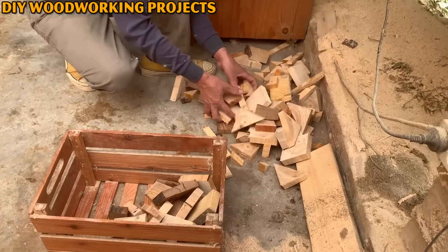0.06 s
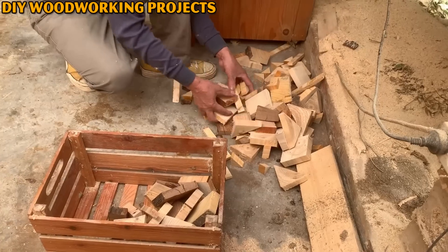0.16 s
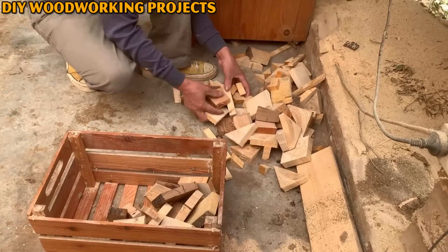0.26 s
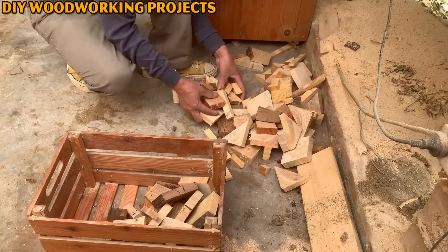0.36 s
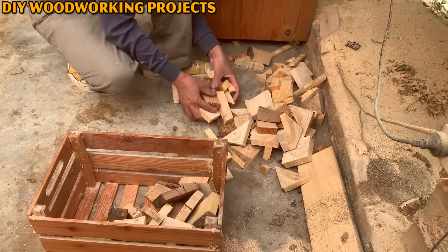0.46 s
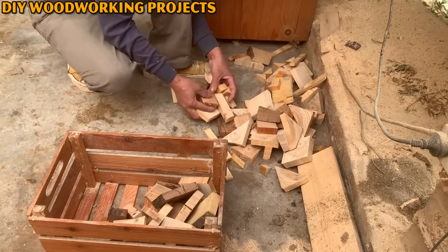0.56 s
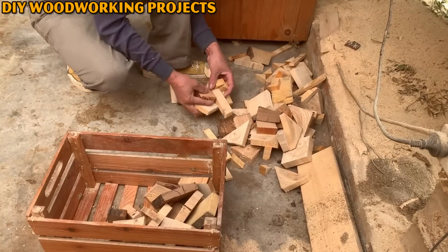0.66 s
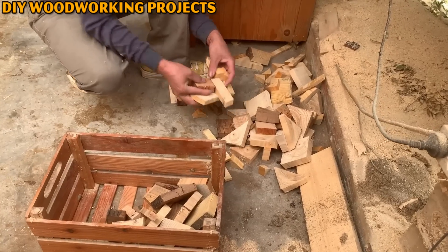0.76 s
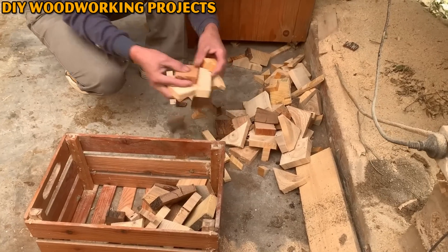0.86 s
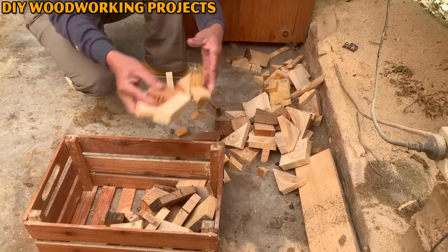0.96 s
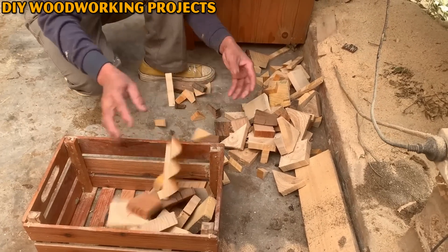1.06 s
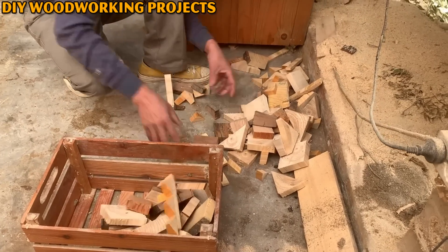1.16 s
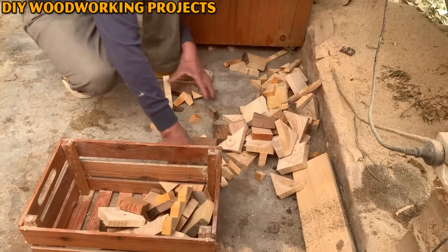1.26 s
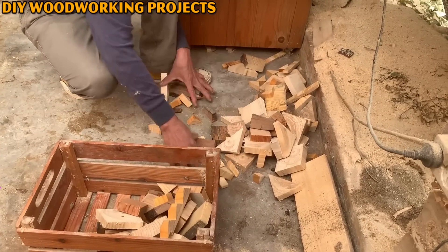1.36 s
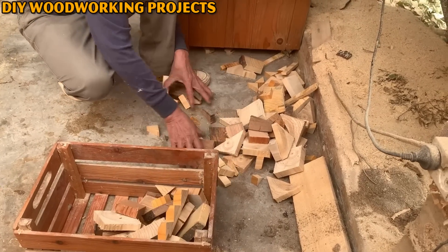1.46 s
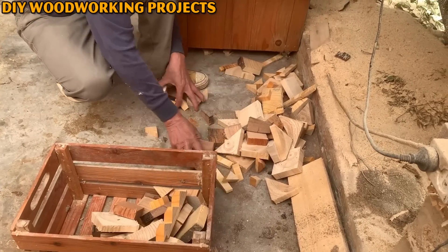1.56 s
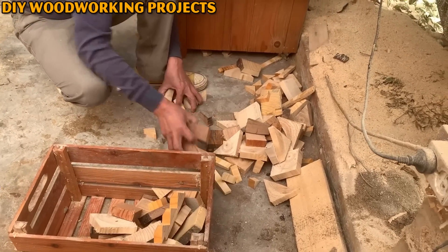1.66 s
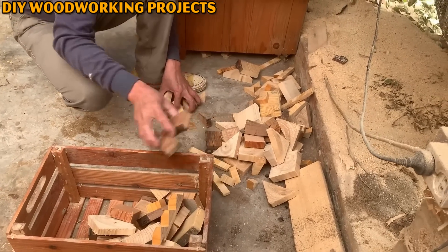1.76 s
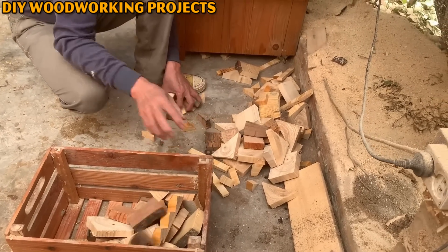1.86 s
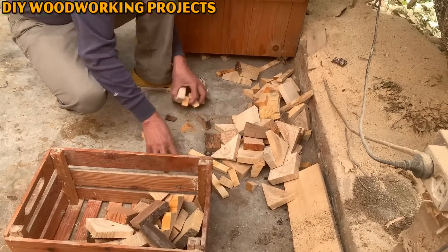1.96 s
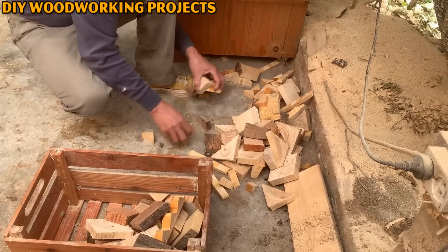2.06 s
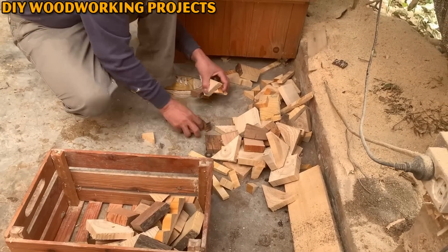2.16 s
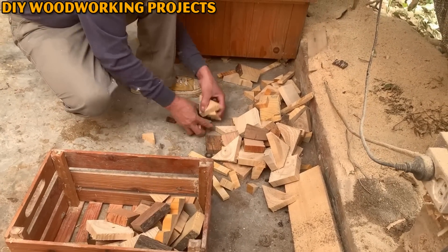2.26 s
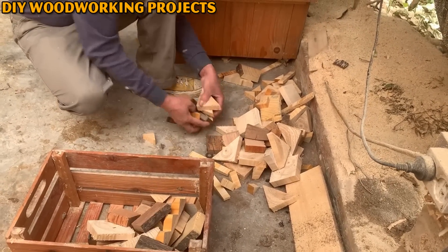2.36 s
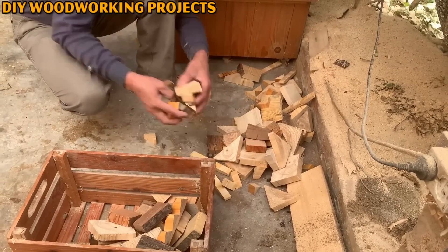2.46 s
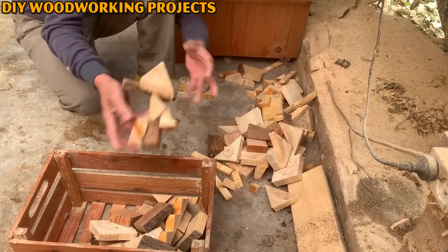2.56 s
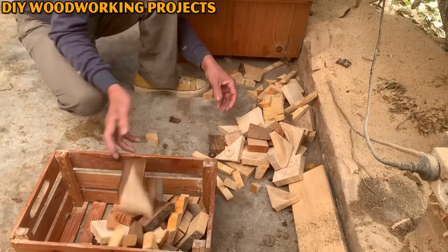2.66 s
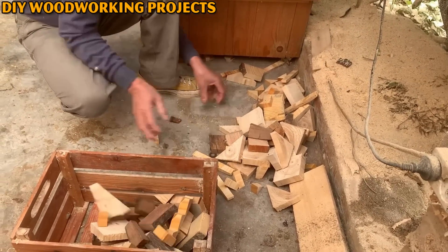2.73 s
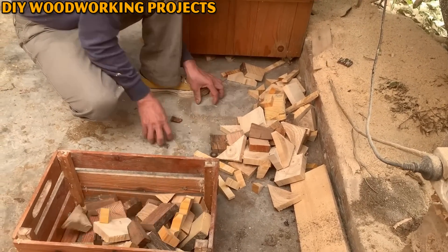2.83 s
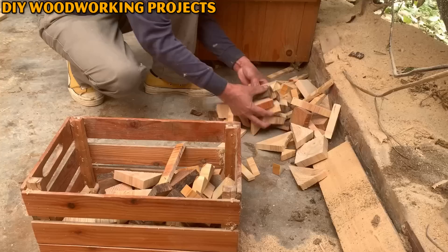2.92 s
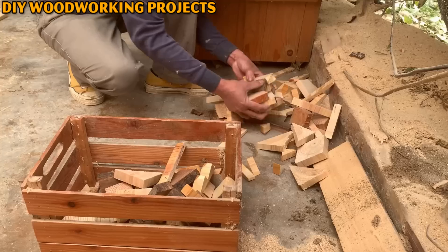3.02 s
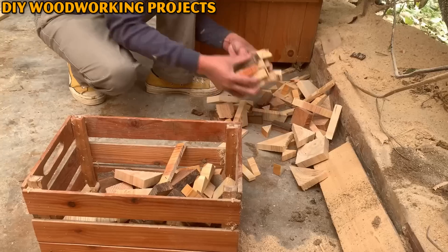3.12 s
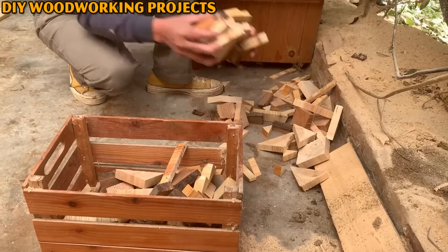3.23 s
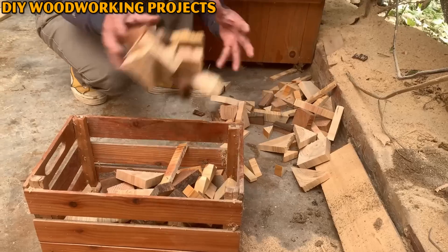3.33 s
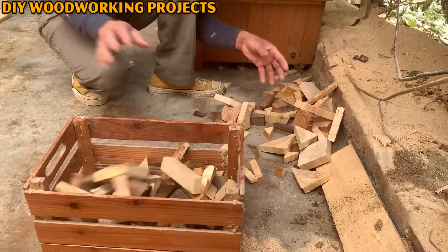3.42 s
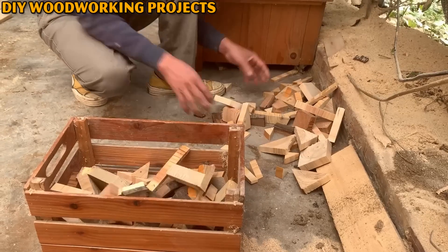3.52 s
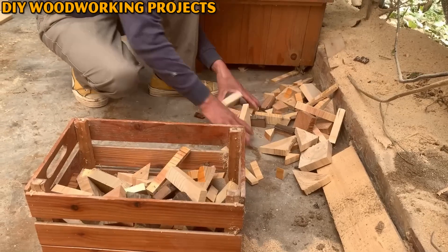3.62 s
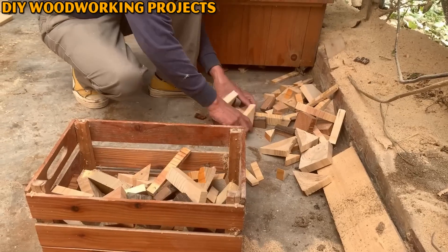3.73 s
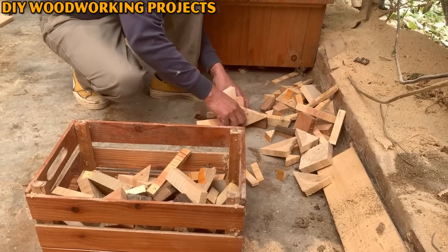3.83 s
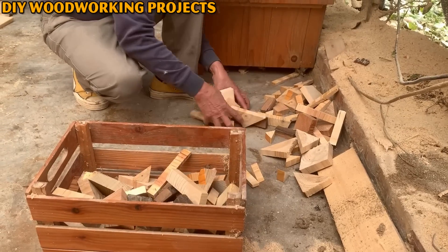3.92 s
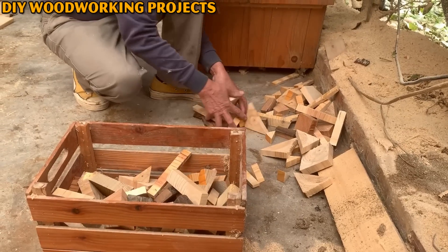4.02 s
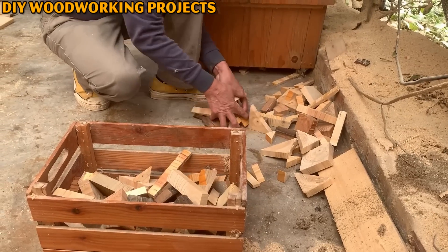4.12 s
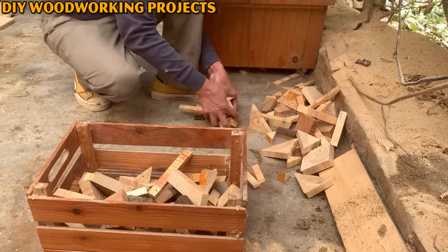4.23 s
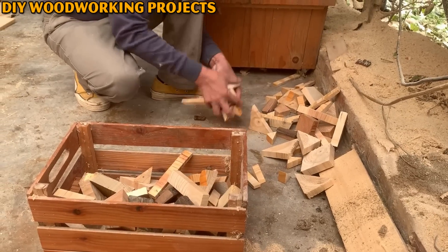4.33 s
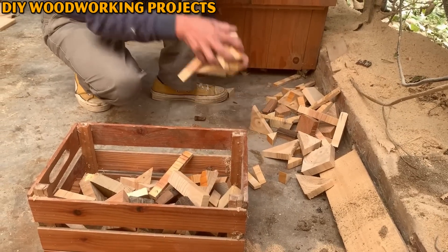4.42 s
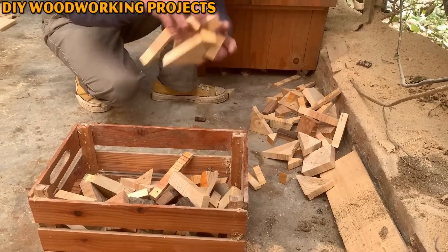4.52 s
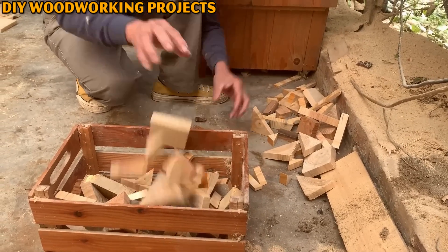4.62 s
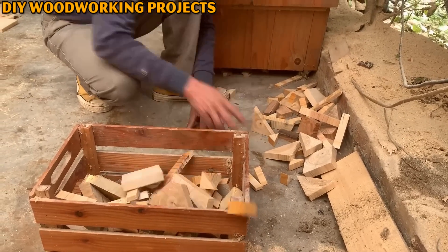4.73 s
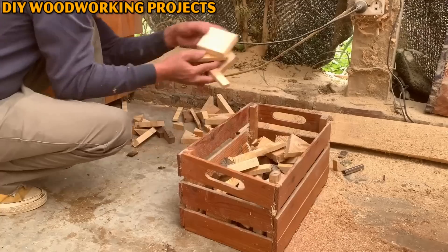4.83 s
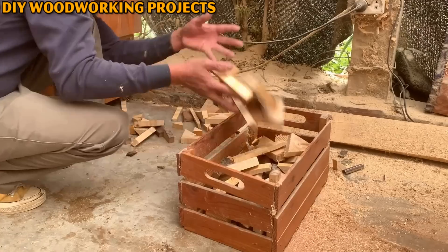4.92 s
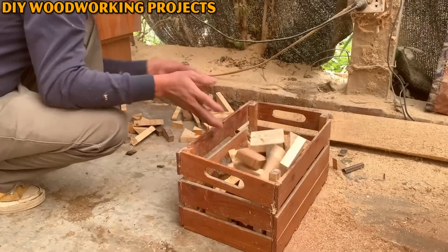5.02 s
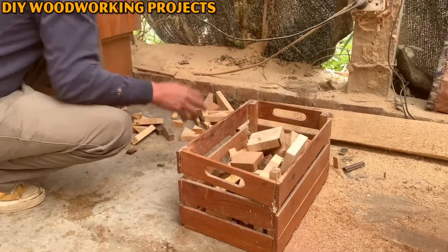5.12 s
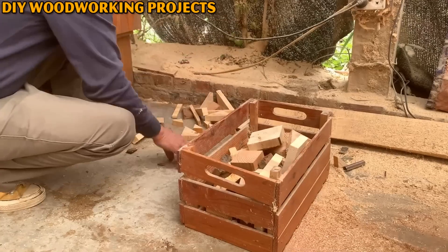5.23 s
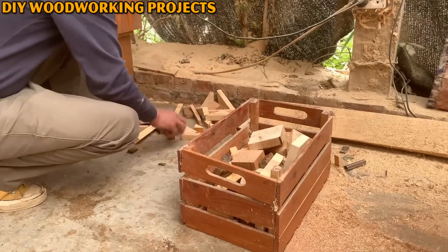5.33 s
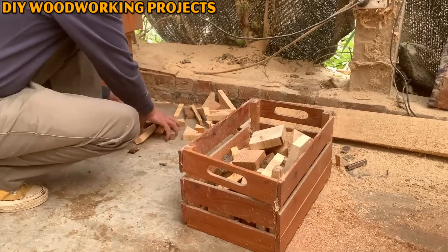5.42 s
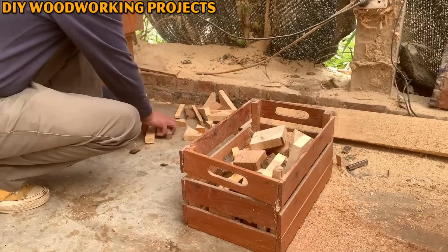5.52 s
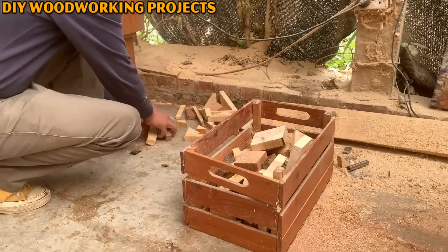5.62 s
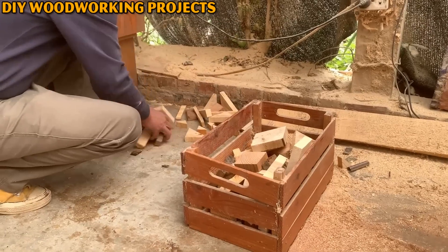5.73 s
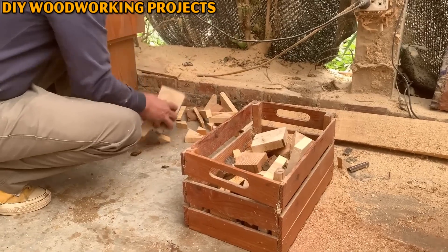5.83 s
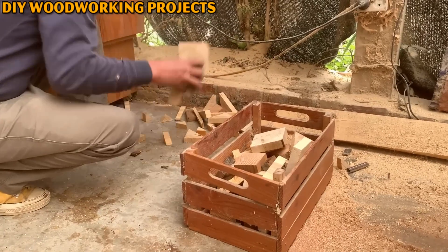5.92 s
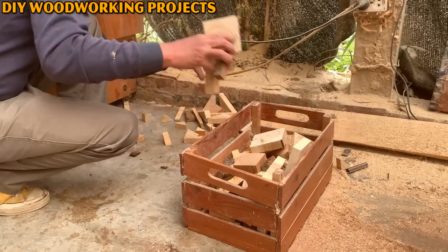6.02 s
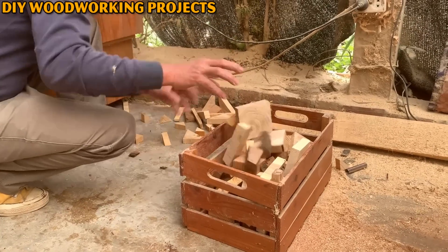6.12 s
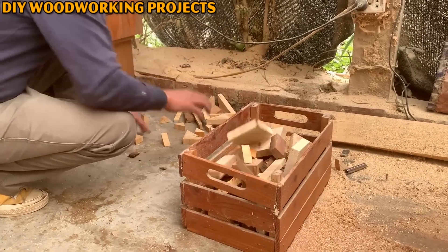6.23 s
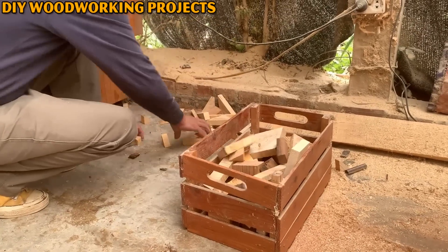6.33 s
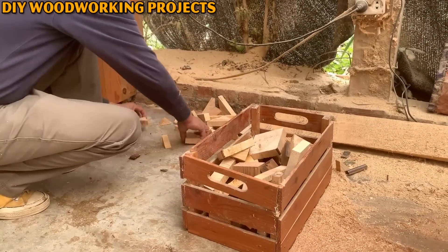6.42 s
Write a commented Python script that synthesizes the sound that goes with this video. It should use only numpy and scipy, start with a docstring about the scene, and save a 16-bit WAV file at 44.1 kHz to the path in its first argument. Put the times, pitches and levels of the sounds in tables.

```python
"""Wood offcuts knock and clatter as hands rake them over a dusty concrete floor and toss them into a slatted crate.
Every knock is a short chatter of contacts that rings the block, its neighbours and the crate, with a surface crack.
Raking and tumbling are ticked and rubbed wood rings, sawdust hiss and low drag; one block squeaks, all shaped noise.
A roofed yard answers the knocks with a short noise tail, over a low outdoor rumble of drifting noise bands.
Two widely spaced microphones hear it; twice the level dips for a moment."""
import sys
import numpy as np
from scipy import signal
from scipy.fft import rfft, irfft
from scipy.io import wavfile
from scipy.ndimage import uniform_filter1d

SR = 44100
rng = np.random.default_rng(int(sys.argv[2]) if len(sys.argv) > 2 else 0)


def write(x):
    x = np.atleast_2d(x).T
    wavfile.write(sys.argv[1], SR, np.round(np.clip(x, -1, 1) * 32767).astype(np.int16))

N = 285768  # length in samples

# knocks of block on block and crate: loudest_s, block_db, lower_ring_db (re block), crate_thud_db (re block),
# crack_db (re block), lower_ring_hz, block_pitch_hz, build_up_ms
KNOCK_EVENTS = [(0.013, -52, -3, 1.5, -29, 945, 1590, 2.9), (0.068, -49.5, -8, -3, -20, 1038, 1960, 2.4),
                (0.198, -56, 6, 6, -5.5, 500, 1520, 4.6), (0.294, -59, -6, -5, -9, 530, 2880, 1.9),
                (0.315, -52, -26, -20, -15, 1330, 2990, 2.5), (0.402, -59, -3, 5, -6, 830, 3200, 3.3),
                (0.44, -57, -4, -6, -11, 930, 4240, 1.4), (0.489, -46.5, -29, -12, -7, 1320, 3400, 2.1),
                (0.545, -52.5, 7, 2, -7.5, 956, 1700, 5.9), (0.617, -47.5, -7, -10, -11, 1430, 1520, 11),
                (0.779, -55, -4, -25, -24, 1020, 2880, 1.3), (0.907, -55, -10, -13.5, 8, 905, 3250, 3),
                (1.024, -48, 8.5, 2.5, -22, 660, 2000, 2.5), (1.046, -32, -6, -9.5, -20, 710, 1540, 3.1),
                (1.058, -39.5, 4, -8.5, -9, 910, 4830, 10.4), (1.096, -35.5, -15, -8, -24, 750, 2590, 2.1),
                (1.118, -44.5, -12, 4, -30, 534, 1520, 3), (1.129, -45.5, 11, -2.5, -16, 487, 1760, 7.5),
                (1.145, -26, -21.5, -12.5, -9.5, 1580, 1750, 3.7),
                (1.169, -31, 3.5, -9, -12, 1250, 1930, 2.5), (1.177, -23, -18, -10.5, -22, 1230, 3100, 3.2),
                (1.202, -43, 5, -31, -29, 492, 1720, 12), (1.252, -43, -7, -11, -17, 547, 1800, 2.2),
                (1.268, -50.5, 7, -4, -23, 740, 1510, 2.1), (1.306, -29, -25, -24.5, -7.5, 1110, 5140, 2.3),
                (1.573, -62.5, 7.5, -22, -31, 734, 1640, 1.6), (1.631, -51, -15, -3, -9, 1140, 3000, 12),
                (1.702, -54.5, -16.5, -12, -20, 950, 2120, 1.6), (1.909, -47, 3, -14, -37, 1144, 1780, 4.3),
                (1.961, -31.5, -11.5, -26, -17, 1370, 3010, 2.6),
                (1.967, -27.5, -5, -10.5, -18, 1400, 1460, 2.1),
                (1.976, -28, -7, -35, -4.5, 1110, 5840, 3.1), (2.099, -57, -15, -6, -8, 890, 2920, 4.4),
                (2.218, -53, -8, -32, -19, 797, 2870, 3.5), (2.392, -50, -14, -9, -11, 837, 2830, 1.6),
                (2.422, -52, -12.5, -10.5, -0.5, 1020, 4800, 4.1),
                (2.755, -33.5, -0.5, -17.5, -14.5, 850, 2750, 4), (2.77, -27, -14, -33, -15, 1050, 2600, 8),
                (2.799, -29, -18.5, -11, -22, 1600, 1450, 2.8),
                (2.807, -21, -34.5, -50, -26, 1320, 4550, 2.4),
                (2.829, -43, -7.5, -30, -12, 1260, 2070, 2.8),
                (2.909, -40.5, -0.5, -28, -15, 643, 1470, 1.6), (2.917, -41, 6, -8, -9.5, 756, 2320, 2.7),
                (2.962, -27.5, -4, -15, -22, 1220, 1945, 2.3), (2.972, -35, -4, -10, -20, 790, 1880, 9.4),
                (3.038, -59.5, 2, -9, -19, 1130, 1640, 4), (3.077, -46.5, 7, -6, -30, 956, 3920, 2.5),
                (3.093, -50.5, -1, 4, -42, 590, 1940, 3.3), (3.224, -65, 6, 13, -6, 900, 3300, 3),
                (3.335, -60.5, -3, -7.5, -20, 1230, 1550, 2.5),
                (3.506, -31, -9, -22.5, -19, 1403, 1650, 5.3),
                (3.523, -11.5, -15, -36, -27.5, 1040, 2524, 6.5),
                (3.531, -31.5, -4.5, -23, -10.5, 820, 1980, 11),
                (3.546, -28.5, -2, -19, -18.5, 848, 3900, 12), (3.559, -24, -3, -23, -17.5, 860, 1900, 3.3),
                (3.569, -21.5, -10, -23.5, -21.5, 840, 3500, 10.8),
                (3.68, -55, 9.5, -3, -47, 915, 1760, 4.5), (3.752, -42.5, 0.6, -16, -37, 1160, 1600, 2.7),
                (3.78, -51.5, -20, -17, -19, 740, 3170, 2.1), (3.805, -54, 5.5, -8, -8, 1005, 1510, 1.2),
                (3.921, -56.5, 0.6, -9, -20, 1020, 1490, 4.2), (4.034, -60, 9.5, 11.5, -16, 850, 1970, 5.3),
                (4.111, -49, -7, -6, -17, 880, 2500, 10), (4.136, -58, 10, 13, -9, 800, 3140, 2.9),
                (4.144, -40.5, -4.5, -14, -25.5, 1200, 3140, 2.6),
                (4.277, -40, -8, -19, -6, 1180, 2860, 2.1), (4.292, -51, 4.5, -21.5, -22, 874, 1503, 2.1),
                (4.319, -36.5, -9, -18, -13.5, 824, 2944, 2.4),
                (4.716, -23, 1.5, -26.5, -23.5, 1310, 1614, 4),
                (4.723, -29, -4, -26, -22.5, 1280, 1530, 9.6), (4.744, -37, -0.5, -18, -6, 940, 1900, 12.8),
                (4.765, -28, -1.5, -17, -14, 980, 3600, 2.1),
                (4.782, -34, -7.5, -10.5, -20, 794, 2040, 11.6),
                (4.798, -32, -10, -25, -17, 700, 2090, 2.7), (4.832, -49, -5, -10, -15, 800, 2150, 16),
                (4.886, -43.5, -4, -17, -40, 1530, 2630, 4.4), (4.904, -47.5, -9, -9.5, -9, 560, 4130, 5.1),
                (4.962, -46.5, -1, -23, -17, 1081, 1560, 3.5), (4.976, -46, -2.5, -27, -15, 963, 4080, 5.1),
                (5.01, -45.5, -23.5, -22.5, -6.5, 720, 4430, 4.1),
                (5.064, -22, -18.5, -21, -26, 1425, 3390, 2.4), (5.083, -32, -6, -15, -6, 1500, 3360, 5),
                (5.107, -34.5, 3, -4.5, -15, 720, 2840, 9.8),
                (5.125, -32.5, 4.5, -18, -26, 1350, 3330, 2.6), (5.144, -34, 1, -12, -28, 740, 2300, 3.6),
                (5.346, -62.5, 11, 7.5, -17.5, 672, 1640, 5.4),
                (5.502, -57.5, 2.5, -14, -8.5, 610, 4300, 2.1), (5.58, -50, 0, -7.5, -6.5, 510, 1550, 6.5),
                (5.62, -53.5, 5, -13, -27, 710, 1930, 3.1), (5.7, -49.5, 2, -36, -12, 1470, 1510, 1.8),
                (5.732, -51.5, -13, -20, -21, 1510, 1420, 9), (5.864, -42.5, 9, -11, -20, 820, 1765, 2.1),
                (6.218, -21.5, -6.5, -40, -27.5, 720, 3430, 5.1),
                (6.234, -27.5, -2, -15.5, -27, 1000, 1930, 9),
                (6.242, -25, -26, -38.5, -24.5, 850, 2130, 8.2),
                (6.279, -40.5, -11, -17, -13, 530, 1810, 9.1), (6.301, -47.5, 2, -27, -19, 1260, 1810, 2.6),
                (6.325, -46.5, 3.5, -5.5, -11, 1040, 1900, 5.1), (6.37, -39.5, 0, -14, -11.5, 535, 3710, 8),
                (6.404, -39, 10.5, -12, -41, 720, 1550, 4.2), (6.466, -31, -0.5, -41, -38, 753, 2070, 4)]
# small knocks under the hands, one row each for block_db (re rasp), lower_ring_db, crate_thud_db and crack_db
# (re block): mean_db, spread_db
NUDGE_LEVELS = [(0.6, 2.5), (3, 4), (-6, 3.5), (-14, 6)]
# resonances of crate slats and air: pitch_hz, relative_level_db, t60_s
CRATE_MODES = [(75, -10, 0.05), (124, -12, .09), (176, -2.5, 0.056), (252.7, 3.5, 0.045), (346.2, 1, 0.049),
               (412, -1.5, 0.035)]
# hands raking pieces over the floor: loudest_s, rasp_db, rise_s (first 20 dB), fall_s (first 20 dB),
# dust_db (re rasp)
RAKE_STROKES = [(.04, -61, .3, .15, -13), (.13, -60, .12, .1, -6), (.3, -63, .3, .5, -13),
                (.545, -58, .1, .12, -11), (.613, -52.5, .045, .055, -12), (.74, -62, .055, .09, -11),
                (.916, -62, .03, .08, -1.5), (1.26, -54, .1, .15, -16), (1.314, -49, .05, .055, -5),
                (1.458, -57, .055, .09, -2.5), (1.632, -52.5, .053, .04, -7), (1.712, -67, .12, .12, -11),
                (1.93, -67, .1, .1, -4.5), (2.12, -62, .12, .04, -10), (2.235, -67.5, .036, .14, -13),
                (2.405, -62, .09, .052, -1.5), (2.607, -72, .12, .08, -8), (3.081, -57, .08, .12, -14),
                (3.18, -67, .1, .25, -17), (3.43, -80, .15, .05, -5), (3.67, -64, .15, .1, -20),
                (3.861, -54.5, .18, .14, -12), (4.0, -65, .15, .2, -11), (4.13, -59, .16, .1, -14),
                (4.285, -48, .04, .075, -8.5), (4.5, -73, .03, .25, -6), (5.02, -63, .2, .1, -2.5),
                (5.25, -67, .1, .1, -22), (5.354, -70.5, .05, .15, -8.5), (5.515, -65.5, .04, .15, -15),
                (5.6, -57, .12, .14, -12), (5.71, -59.5, .05, .25, -9), (5.855, -58, .2, .06, -12),
                (6.02, -80, .08, .1, -10), (6.303, -53.5, .05, .2, -14), (6.46, -60, .2, .1, -17)]
# pieces tumbling around a landing: loudest_s (after a steep rise), rasp_db, slide_s, dust_db (re rasp),
# drag_db (re rasp)
LANDING_TUMBLES = [(1.054, -42, .02, -9, -5), (1.177, -31.5, .005, -14, -4), (1.971, -33, .002, -17, -11),
                   (2.77, -32, .07, -11, -7), (2.917, -47, .06, -12, 4), (3.514, -27, .065, -16, -14),
                   (4.719, -32, .12, -17, -6), (4.896, -47, .003, -17, -15), (5.076, -34, .14, -15, -12),
                   (6.226, -29, .015, -16, -14)]
# colour of small wood on wood: pitch_hz, relative_level_db
RASP_COLOUR = [(450, -11), (900, 1.5), (2000, -4), (3500, -0.5), (6500, -13.5)]
# a block squeaking along the floor: start_s, end_s, level_db
SQUEAK_SPAN = (5.688, 5.785, -57.5)
# rings of the squeaking block: pitch_hz, width_hz, relative_level_db
SQUEAK_MODES = [(1490, 83, -2.5), (3250, 250, -3.5), (720, 74, -11)]
# fading of the yard's answer: pitch_hz, t60_s
ECHO_DECAY = [(100, 0.57), (400, 0.2), (1040, 0.14), (2100, .15), (3800, 0.17), (7280, 0.12)]
# colour of the outdoor background: pitch_hz, relative_density_db (per Hz)
YARD_COLOUR = [(12, -36), (20, 3.5), (103, 9), (225, -2), (404, -7.5), (549, -15.5), (1630, -32),
               (2760, -16.5), (6360, -36), (11400, -27), (15500, -48.5)]
# brief dips in level: start_s, end_s, depth_db
LEVEL_DIPS = [(3.008, 3.03, -24), (4.861, 4.878, -20)]

RING, LEAD = 4096, 800  # samples: one knock in full, and the run-up before its loudest moment
STEP = 64  # samples between points of the raking level curves
PAN_SPREAD_DB = 3  # spread of the level difference between microphones
NUDGE_LOW_HZ, NUDGE_HZ, NUDGE_BUILD_MS = (520, 1200), (1500, 3300), (1.5, 11)  # lowest and highest draw
DRAG_DB, DRAG_SLOPE = -62, .65  # stroke drag when the rasp is at -60 dB; dB gained per dB of rasp
STROKE_BEND = 1.5  # 1 = even fade in dB; more = fuller top, steeper ends
TUMBLE_RISE_DB_S, TUMBLE_SAG_DB_S, TUMBLE_STOP_DB_S, DUST_SETTLES_DB_S = 1050, 120, 400, 50
ECHO_DB, ECHO_BUILD_S = -11, .001  # energy of the tail; time constant of its onset
YARD_DB = -66.5
CEILING, TOP_HZ = .4, 15800  # limit of the rounded peaks; where the top is cut


def knocks():
    """Each chatter of contacts rings the block, its lower neighbours and the crate, and cracks at the surface."""
    rows = np.hstack([np.transpose(KNOCK_EVENTS), nudges()])
    loudest_s, block_db, low_db, thud_db, crack_db, low_hz, block_hz, build_ms = rows
    events, t = len(loudest_s), np.arange(RING // 2) / SR
    pan_db = PAN_SPREAD_DB * rng.standard_normal(events)
    contacts = chatter(build_ms)
    # a blow with little crack is a soft one and leaves the high rings weak
    soft = np.clip(-.045 * (crack_db + 8), 0, 1.6)
    block_ring = block(block_hz, .024, 1418, 7000, -3.5, .019, soft)
    lower_ring = block(low_hz, .024, 450, 1500, -10, .022, np.full(events, .45), count=8)
    crate_hz, crate_db, crate_t60 = np.transpose(CRATE_MODES)
    struck = undb(crate_db) * rng.standard_normal((events, 2, len(CRATE_MODES)))
    thud = modes(crate_hz, struck, crate_t60)
    splinter = rng.standard_normal((events, 2, RING // 2)) * np.exp(-t / .0026)
    crack = band(splinter, 5500, 12500)
    # response, level in dB re block, stretch in s over which its peak is levelled
    parts = [(block_ring, 0, .0025), (lower_ring, low_db, .003), (thud, thud_db, .009), (crack, crack_db, .002)]
    sound = 0
    for response, relative_db, window_s in parts:
        chattered = irfft(rfft(response, RING) * contacts, RING)
        sound = sound + undb(relative_db)[..., None, None] * peak_unit(chattered, window_s)
    sound = sound * undb(block_db[:, None] + np.outer(pan_db, [.5, -.5]))[..., None]
    out = np.zeros((2, N + RING))
    for at, one in zip((loudest_s * SR).astype(int), sound):
        out[:, at:at + RING] += one
    # small pieces move too little air to sound deep
    return band(out[:, LEAD:N + LEAD], 55, 18000)


def chatter(build_ms, count=14):
    """Faces never meet at once: contacts gather round a main blow, at other times for each microphone."""
    events = len(build_ms)
    place, size = rng.laplace(size=(events, 2, count)), rng.standard_normal((events, 2, count))
    main = np.arange(count) == 0
    place = np.clip(np.where(main, .12, .9) * place, -3, 2.6)
    # contacts grow towards the main blow and die after it
    size = np.where(main, 2.2, size) * np.exp(-np.abs(place) / 3.2)
    # the ring is loudest a moment after the main contact
    lag = LEAD - .0017 * SR + .45 * place * build_ms[:, None, None] * SR / 1000
    lag = np.clip(lag, 0, RING // 2 - 1).astype(int)
    train = np.zeros((events, 2, RING))
    np.add.at(train, (np.arange(events)[:, None, None], np.arange(2)[:, None], lag), size)
    return rfft(train)


def block(hz, t60, lo_hz, hi_hz, side_db, side_t60, tilt, count=16):
    """The block's own ring over many short ones of its neighbours; both t60 hold at lo_hz, higher rings die sooner."""
    # each microphone faces other sides of the pieces, so gains differ
    place, gain = rng.random((len(hz), count)), rng.standard_normal((len(hz), 2, count))
    own = np.arange(count) == 0
    spread_hz = lo_hz * (hi_hz / lo_hz) ** ((np.arange(count) - place) / (count - 1))
    pitch = np.where(own, hz[:, None], spread_hz)
    # pieces of like size ring near the block's pitch; above it the softness of the blow decides
    ratio = pitch / hz[:, None]
    near = np.where(ratio > 1, ratio ** -(tilt[:, None] + .17), ratio ** .49)
    side = undb(side_db) * np.sign(gain) * (.6 + .28 * np.abs(gain)) * near[:, None]
    level = np.where(own, 1 + .39 * gain, side)
    decay = np.where(own, t60, side_t60) * ((lo_hz / pitch) ** .75)[:, None]
    rings = modes(pitch[:, None], level, decay)
    # the push takes a fraction of a cycle to build, so the onset is rounded
    return rings * (1 - np.exp(-np.arange(RING // 2) / SR * lo_hz * 3.9))


def modes(hz, gain, t60):
    """Struck resonances: a sum over the last axis of decaying sines."""
    t = np.arange(RING // 2, dtype=np.float32) / np.float32(SR)
    turn = np.asarray(2 * np.pi * hz, np.float32)[..., None] * t
    fade = np.asarray(np.log(1000) / t60, np.float32)[..., None] * t
    return (gain[..., None, :].astype(np.float32) @ (np.sin(turn) * np.exp(-fade)))[..., 0, :]


def nudges(count=85):
    """Small random knocks of raked pieces, laid out as KNOCK_EVENTS columns; their level follows the stroke's rasp."""
    rasp_db = strokes()[0]
    even, normal = rng.random((count, 4)).T, rng.standard_normal((count, 4))
    place = (np.arange(count) + even[0]) / count
    mean_db, spread_db = np.transpose(NUDGE_LEVELS)
    db = (mean_db + spread_db * normal).T
    block_db = rasp_db[(place * len(rasp_db)).astype(int)] + db[0]

    def pick(span, u):
        return span[0] * (span[1] / span[0]) ** u

    return np.array([place * N / SR, block_db, *db[1:], pick(NUDGE_LOW_HZ, even[1]),
                     pick(NUDGE_HZ, even[2]), pick(NUDGE_BUILD_MS, even[3])])


def raking():
    """Edges skid and tumble in uneven slips that ring the wood; sawdust hisses; the heavy pieces drag."""
    levels = total_db(np.array([strokes(), tumbles()]))
    wood_db, dust_db, drag_db = (np.interp(np.arange(N), np.arange(0, N, STEP), curve) for curve in levels)
    slip = undb(3.5 * walk(90))
    grit = rng.standard_normal((2, N)) * slip ** .66 * undb(2.3 * rng.exponential(size=N))
    # gentle raking is fine and bright, tumbling is coarser and duller
    fine = np.clip((-39.5 - wood_db) / 18, 0, 1)
    # dust_db sets the lower hiss; the brighter one adds to it
    dust = unit(band(grit, 4200, 8500)) + (.4 + .9 * fine) * unit(band(grit, 5800, 12800))
    drag = unit(band(rng.standard_normal((2, N)) * undb(2.5 * walk(30)), 120, 580))
    wood = rattle(slip, 110, 5.47)
    return undb(wood_db) * wood + undb(dust_db) * dust + undb(drag_db) * drag


def strokes():
    """Each stroke swells to its loudest moment and fades; rasp, dust and drag levels in dB."""
    loudest_s, db, rise_s, fall_s, dust_db = np.transpose(RAKE_STROKES)[..., None]
    since = np.arange(0, N, STEP) / SR - loudest_s
    away = np.where(since < 0, -since / rise_s, since / fall_s)
    wood_db = db - 20 * away ** STROKE_BEND
    rasp_db = total_db(wood_db)
    return rasp_db, total_db(wood_db + dust_db), DRAG_DB + DRAG_SLOPE * (rasp_db + 60)


def tumbles():
    """Each tumble rises steeply, sags while pieces slide and stops quickly, dust first; rasp, dust and drag in dB."""
    loudest_s, db, slide_s, dust_db, drag_db = np.transpose(LANDING_TUMBLES)[..., None]
    since = np.arange(0, N, STEP) / SR - loudest_s
    slide_s = np.abs(slide_s)
    rise = TUMBLE_RISE_DB_S * np.minimum(since, 0)
    sag = TUMBLE_SAG_DB_S * np.clip(since, 0, slide_s)
    stop = TUMBLE_STOP_DB_S * np.maximum(since - slide_s, 0)
    wood_db = db + rise - sag - stop
    dust_db = dust_db - DUST_SETTLES_DB_S * np.maximum(since, 0)
    return total_db(wood_db), total_db(wood_db + dust_db), total_db(wood_db + drag_db)


def rattle(drive, ticks_per_s, sharpness, count=22):
    """Many small pieces, each with its own ring, ticked at random moments on top of a steady rub."""
    out = 0
    hz_points, db_points = np.transpose(RASP_COLOUR)
    pitches = np.geomspace(hz_points[0], hz_points[-1], count) * np.exp(.04 * rng.standard_normal(count))
    half = 1 + .5 / sharpness  # ratio from pitch to band edge
    for hz in pitches:
        ticks = 1. * (rng.random((2, N), np.float32) < ticks_per_s / SR)
        ticks[ticks > 0] = undb(21 + 3.27 * rng.exponential(size=int(ticks.sum())))
        rub = rng.standard_normal((2, N), np.float32)
        push = drive * undb(3 * walk(45)) * (rub + ticks)
        colour_db = np.interp(np.log(hz), np.log(hz_points), db_points)
        out = out + undb(colour_db) * unit(band(push, hz / half, hz * half))
    return unit(out)


def squeak():
    """Stick and slip of one block, as noise in fits through narrow bands at its rings."""
    t, (start_s, end_s, db) = np.arange(N) / SR, SQUEAK_SPAN
    active = uniform_filter1d(1. * ((t > start_s) & (t < end_s)), int(.0094 * SR))
    fits = active * undb(db + 3 * walk(60))
    rub = rng.standard_normal((2, N))
    rings = 0
    for hz, width_hz, relative_db in SQUEAK_MODES:
        rings = rings + undb(relative_db) * unit(band(rub, hz - width_hz / 2, hz + width_hz / 2))
    return fits * rings


def echo(x):
    """Walls, roof and crate scatter the knocks into a short tail, other for each microphone; bass stays longest."""
    t = np.arange(SR // 2) / SR
    tail = 0
    for hz, t60 in ECHO_DECAY:
        noise = band(rng.standard_normal((2, len(t))), hz / 1.36, hz * 1.44)
        tail = tail + noise * np.exp(-np.log(1000) * t / t60)
    tail = tail * (1 - np.exp(-t / ECHO_BUILD_S))
    tail = tail / np.sqrt(np.sum(tail ** 2, 1, keepdims=True))
    return undb(ECHO_DB) * signal.fftconvolve(x, tail, axes=1)[:, :N]


def yard():
    """Half-octave bands of far rumble and air that swell together and flicker alone."""
    out, swell = 0, walk(1.5)
    hz_points, db_points = np.transpose(YARD_COLOUR)
    for hz in 25 * 2 ** np.arange(0, 9.5, .5):
        db = np.interp(np.log(hz), np.log(hz_points), db_points) + 2.2 * swell + 2.2 * walk(3)
        noise = rng.standard_normal((2, N))
        # long waves reach both microphones partly alike
        noise = noise + .35 * np.clip(1 - hz / 250, 0, 1) * noise[::-1]
        out = out + undb(db) * band(noise, hz / 1.19, hz * 1.19)
    return undb(YARD_DB) * unit(out)


def walk(rate, count=1):
    """Random levels held 1 / rate s and slewed; spread near 1."""
    k = int(SR / rate)
    held = np.repeat(rng.standard_normal((count, N // k + 1)).astype(np.float32), k, axis=1)
    return 1.2 * uniform_filter1d(held, k, axis=1)[:, :N]


def undb(db):
    """Turns dB into an amplitude factor."""
    return np.exp(np.asarray(db) * (np.log(10) / 20))


def total_db(db):
    """Level of unrelated sounds heard together: their powers add along the first axis."""
    return 10 * np.log10(np.sum(undb(np.maximum(db, -140)) ** 2, 0))


def band(x, lo_hz, hi_hz):
    """Band-pass along the last axis."""
    sos = signal.butter(2, [lo_hz, min(hi_hz, .45 * SR)], "band", fs=SR, output="sos")
    return signal.sosfilt(sos, x)


def unit(x):
    """Scales to rms 1."""
    return x / np.sqrt(np.mean(x ** 2))


def peak_unit(x, window_s):
    """Scales each knock so that its loudest short stretch, over both microphones, has rms 1."""
    power = uniform_filter1d(np.mean(x ** 2, 1), int(window_s * SR), axis=-1)
    return x / np.sqrt(power.max(-1))[:, None, None]


def scene():
    """Knocks with their echo, raking, the squeak and the yard."""
    hits = knocks()
    return hits + echo(hits) + raking() + squeak() + yard()


def record(dry):
    """The level dips twice; the loudest peaks are rounded; the top is cut."""
    t, db = np.arange(N) / SR, np.zeros(N)
    for start_s, end_s, depth_db in LEVEL_DIPS:
        db[(t > start_s) & (t < end_s)] = depth_db
    gain = uniform_filter1d(undb(db), int(.003 * SR))
    rounded = CEILING * np.tanh(dry * gain / CEILING)
    return signal.sosfilt(signal.ellip(10, .2, 80, TOP_HZ, fs=SR, output="sos"), rounded)


dry = scene()
out = record(dry)
write(out)
```